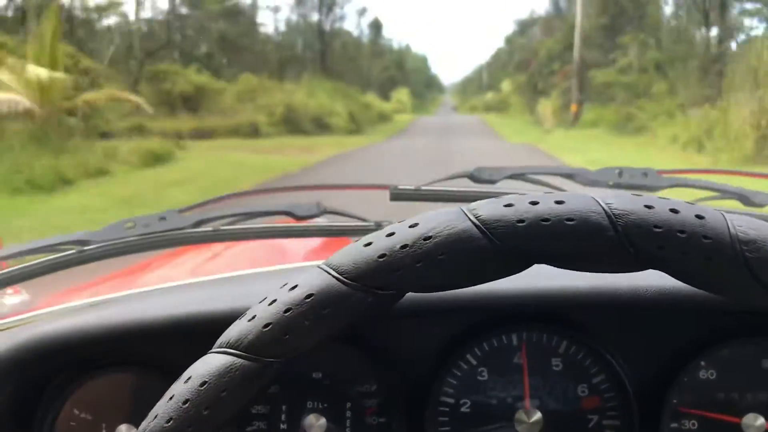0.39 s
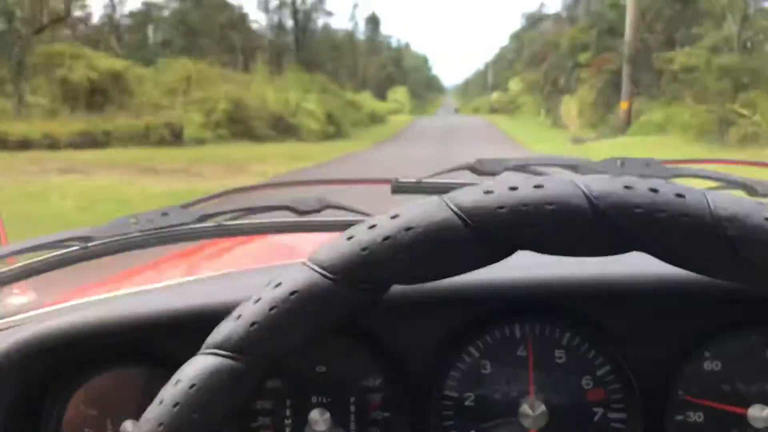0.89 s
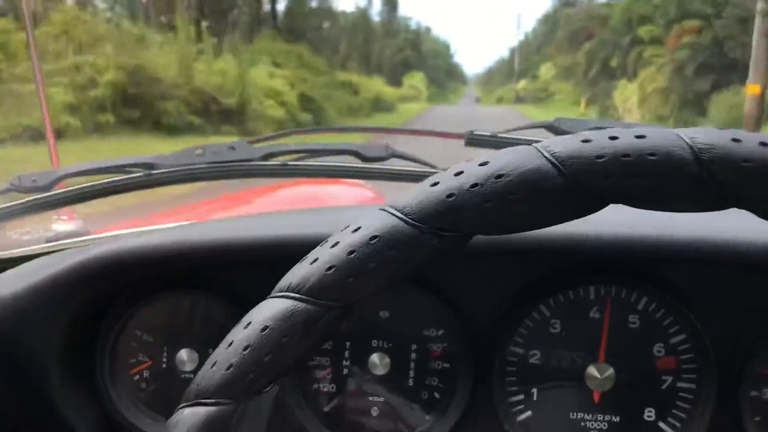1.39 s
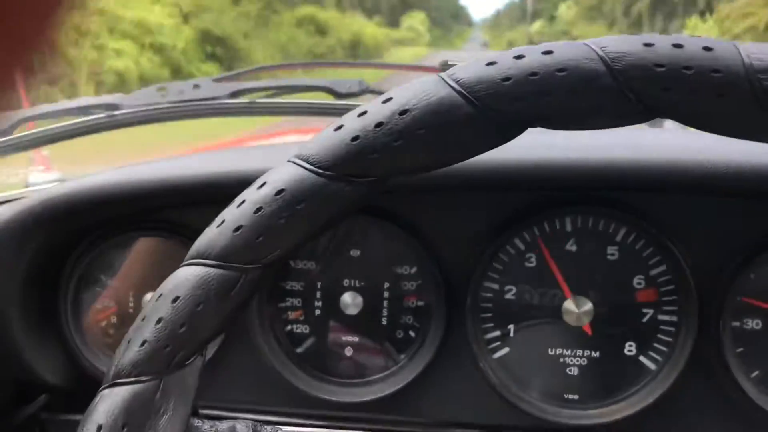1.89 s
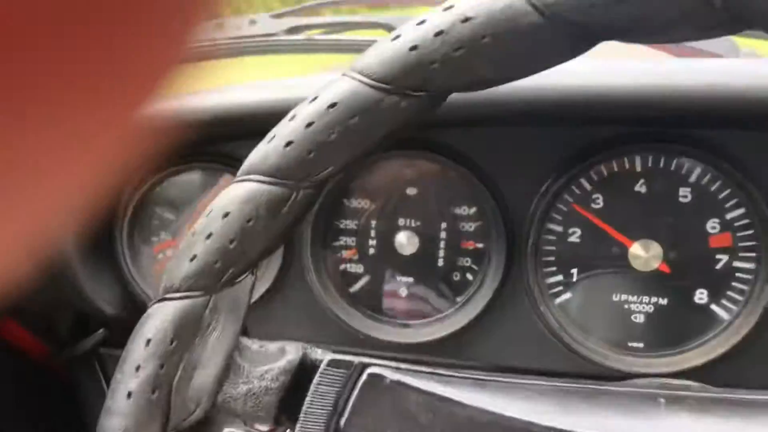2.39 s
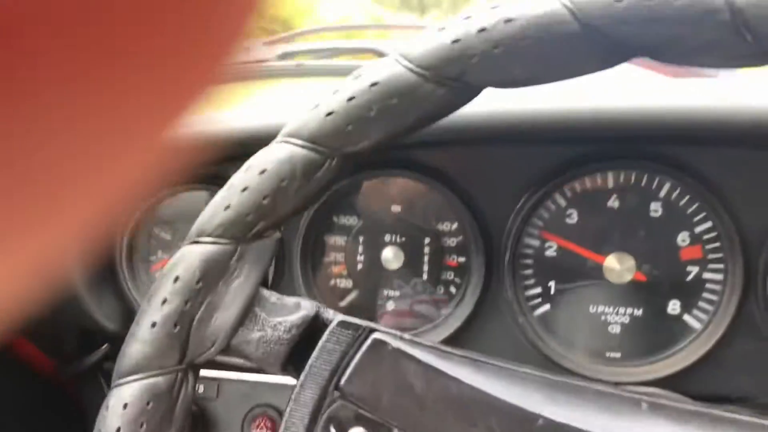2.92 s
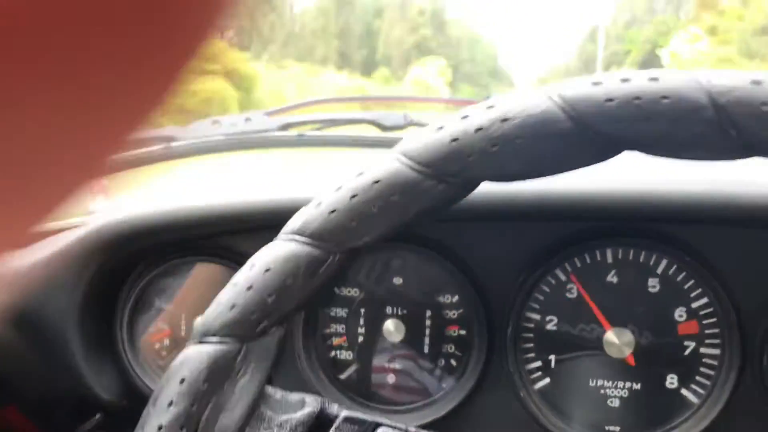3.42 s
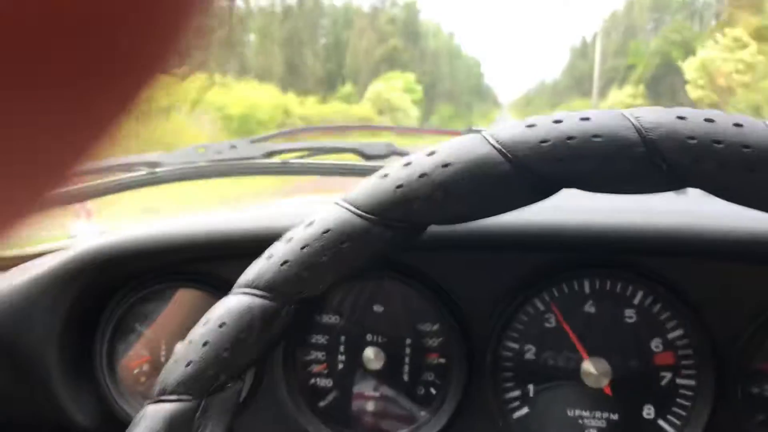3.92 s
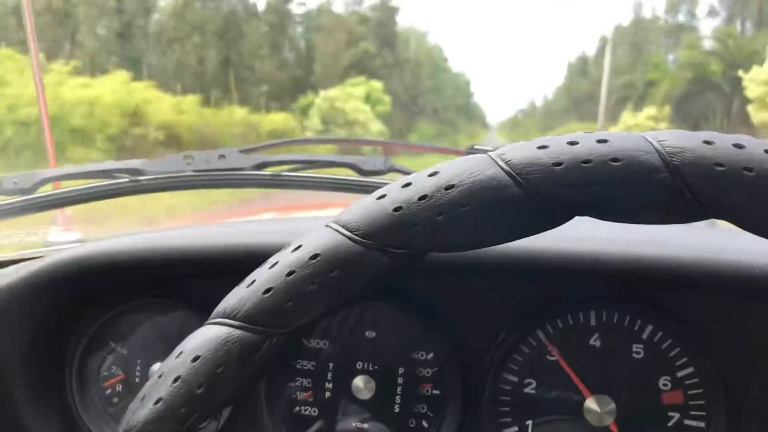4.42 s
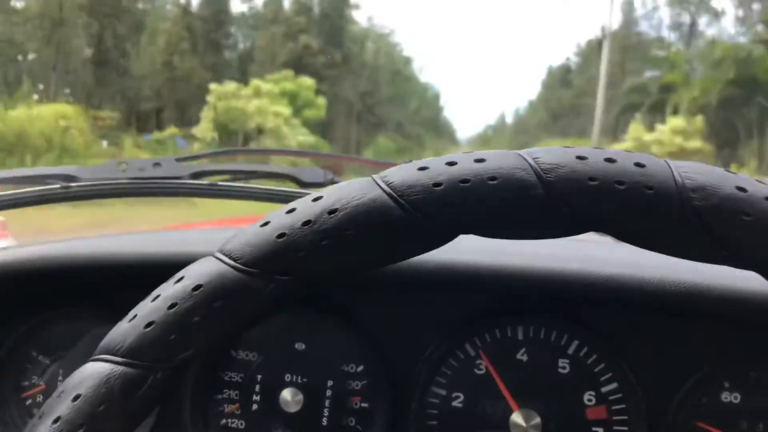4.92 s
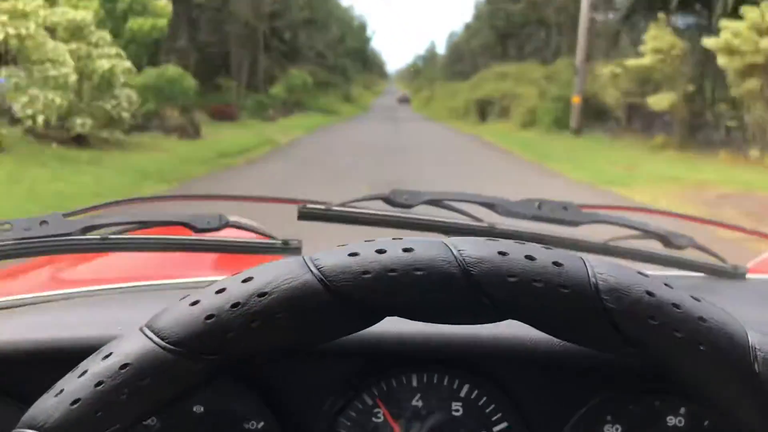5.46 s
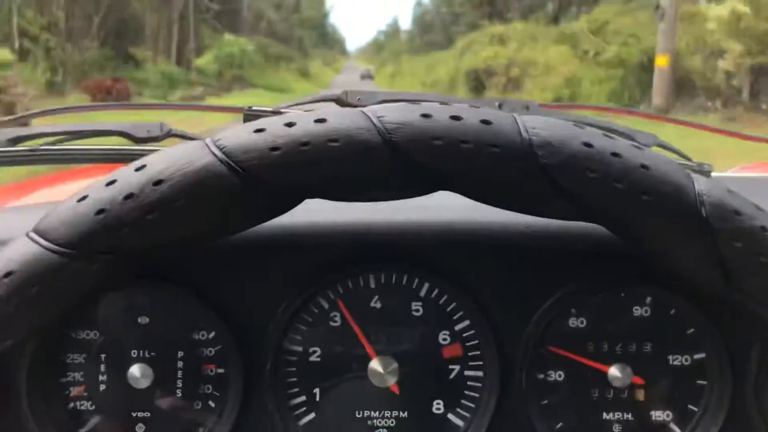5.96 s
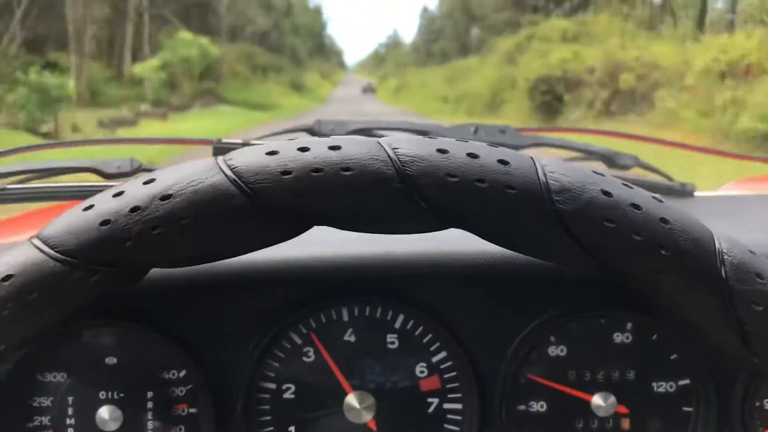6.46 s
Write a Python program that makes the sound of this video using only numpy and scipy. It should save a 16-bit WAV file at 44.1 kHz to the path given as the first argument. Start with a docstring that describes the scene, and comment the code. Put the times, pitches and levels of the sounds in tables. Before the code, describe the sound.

Close inside a small car on a country road, a raspy six-cylinder engine pulls hard and rises slightly. The throttle lifts, pitch slides down nearly an octave with bassy cabin buffeting, the gear lever clunks, and the engine climbs again to a steadier, lower drone. Keys tick brightly against the dash over tyre roar and airy hiss; plastic snaps once later.

```python
"""An air-cooled six-cylinder engine, heard from the driver's seat on a country road, pulls, falls away for a
gear change, is caught by the clutch and pulls again: a sum of half orders of the crank, weighted by load.
Noise drives cabin modes (boom, buffeting), the intake's song and the fan's whistle; shaped noise makes the
road's roar and the hiss of wind and cooling air. Keys tick against the dash, the gear lever knocks and
plastic snaps as struck, decaying modes; a rustle is a burst of filtered noise."""
import sys
import numpy as np
from scipy import signal
from scipy.io import wavfile
from scipy.ndimage import uniform_filter1d

SR = 44100
rng = np.random.default_rng(int(sys.argv[2]) if len(sys.argv) > 2 else 0)


def master(y):
    """Save y as 16-bit WAV."""
    cut = np.clip(np.atleast_2d(y).T, -1, 1)
    pcm = np.round(cut * 32767)  # scale
    wavfile.write(sys.argv[1], SR, pcm.astype(np.int16))


def field_ratio(decibels):
    """Amplitude ratio for a level in dB (20 dB per decade); scalars and array-likes work."""
    return 10 ** (np.asarray(decibels, dtype=float) / 20)


N = 290178

# Throttle: (t/s, share of full load)
LOAD = [(0, 1), (1.28, .9), (1.4, .3), (1.72, .16), (1.8, .03), (2.78, .03), (2.88, .5), (3.3, .6),
        (5.2, .75), (6.58, .65)]
# Cooling fan: (multiple of crank speed, whistle width/Hz, whistle level/dB before its growth with speed)
FAN = (12, 25, -12)


def evened(x):
    """Normalization: scales to rms 1."""
    return x / np.sqrt(np.mean(x ** 2) + 1e-20)


def columns(rows):
    """Linear interpolation: every column of a time table, at each sample."""
    s, *values = np.transpose(rows)
    return [np.interp(np.arange(N) / SR, s, v) for v in values]


def read(points, hz):
    """Spectral envelope: a table of (f/Hz, level/dB) joined by lines on a log-frequency axis."""
    f, db = np.transpose(points)
    return np.interp(np.log(hz + 1), np.log(f + 1), db)


def wander(hz):
    """Low-pass random process: slow chance of rms about 1 with its corner near hz."""
    rate = 400  # knots per second
    steps = rng.standard_normal(N * rate // SR + 2)
    knots = signal.lfilter([1], [1, -np.exp(-2 * np.pi * hz / rate)], steps)
    knots = evened(uniform_filter1d(knots, size=3))
    return np.interp(np.arange(N) * rate / SR, np.arange(len(knots)), knots)


def resonate(x, hz, width):
    """Heterodyne resonator: shifts hz down to zero, smooths with a double pole, shifts back; rms 1."""
    turn = np.exp(2j * np.pi * np.cumsum(hz * np.ones(len(x))) / SR)
    r = np.exp(-np.pi * width / SR)
    smooth = signal.lfilter([1], [1, -2 * r, r * r], x / turn)
    return evened((turn * smooth).real)


def noise(points, patchy_db, size):
    """Spectral synthesis: random short-time spectra under an envelope with drifting patches; rms 1."""
    hz = np.fft.rfftfreq(size, 1 / SR)
    a, b, patches = rng.standard_normal((4 * N // size + 5, len(hz), 3)).T
    patches = uniform_filter1d(patches, size=12, axis=0)  # across frequency
    patches = evened(uniform_filter1d(patches, size=10, axis=1))  # across time
    z = (a + 1j * b) * field_ratio(read(points, hz)[:, None] + patchy_db * patches)
    return evened(signal.istft(z, nperseg=size, noverlap=size - size // 4)[1][:N])


def ring(modes, spread, rise):
    """Modal impulse response: decaying sines, struck unevenly by spread/dB, that build up over rise/s."""
    t = np.arange(SR // 10) / SR
    total = 0
    for hz, db, t60 in modes:
        level_luck, pitch_luck, phase = rng.standard_normal(3)
        decay = field_ratio(db + spread * level_luck - 60 * t / t60)
        total += decay * np.sin(2 * np.pi * hz * (1 + .006 * pitch_luck) * t + phase)
    return (1 - np.exp(-t / rise)) * total


def add(mix, s, sound):
    """Superposition: lays a sound into the mix at time s."""
    part = mix[round(s * SR):][:len(sound)]
    part += sound[:len(part)]


def air_hiss():
    """Turbulence noise: wind and cooling air as broadband hiss whose level flickers slightly."""
    # Hiss spectrum: (f/Hz, relative level/dB)
    spectrum = [(1500, -2), (2500, -3.5), (3100, -4.5), (4260, -5.5), (5000, -12), (5500, -8.5),
                (7000, -11.5), (7700, -14), (8300, -11.5), (9800, -13.5), (10450, -18.5), (11100, -14),
                (14000, -14), (15700, -15.5), (15900, -54)]
    return noise(spectrum, patchy_db=1.08, size=256) * field_ratio(0.51 * wander(hz=21))


def buffeting():
    """Cavity resonance: noise excites the lowest cabin mode, its size partly evened from cycle to cycle."""
    # Level of the lowest cabin mode: (t/s, level/dB before slight wavering)
    level = [(0, -39), (1.7, -19), (2.25, -11.5), (2.35, -25.5), (6.58, -15)]
    surge = resonate(rng.standard_normal(N), hz=47.5, width=14.4)
    surge /= np.sqrt(uniform_filter1d(surge ** 2, size=3000) + 0.51)
    return field_ratio(columns(level)[0] + 0.83 * wander(hz=6.0)) * surge


def road_boom():
    """Room modes: the road's bumps, as one noise, drive all the cabin modes."""
    # Cabin modes: (f/Hz, width/Hz, level/dB over the roar's reference)
    modes = [(69.8, 41, 4), (149.4, 23.3, 2), (291.3, 44, -4), (409, 49, -9), (561.4, 59, -9.5),
             (1035, 110, -17.5)]
    bumps = rng.standard_normal(N)
    return sum(field_ratio(db) * resonate(bumps, hz, width) for hz, width, db in modes)


def roar():
    """Broadband noise under a falling spectral envelope: the engine and tyre roar."""
    # Roar spectrum: (f/Hz, relative level/dB)
    spectrum = [(15, -8), (25, 17.5), (54, 5.5), (151, -13), (201, 0), (286, -13.5), (510, -12), (569, -19),
                (636, -16.5), (1480, -21), (3750, -36.5), (5000, -47), (6500, -70), (11000, -120)]
    return field_ratio(9.5) * noise(spectrum, patchy_db=0.92, size=2048)


def intake_song():
    """Tract resonance: noise makes the intake sing under load."""
    # Resonance of the tract: (f/Hz, width/Hz, level/dB before the song's level)
    tract = [(1393.5, 45, -11)]
    # Course of the song: (t/s, level/dB)
    song = [(0, 0), (.8, 4.5), (1.1, -12), (3, -25), (3.4, -6), (4.2, -13), (5.2, -5), (5.5, -13),
            (6.58, -11)]
    air = rng.standard_normal(N)
    return field_ratio(columns(song)[0]) * sum(field_ratio(db) * resonate(air, hz, width) for hz, width, db in tract)


def fan_whistle(turns):
    """Blade-passing noise: a narrow band follows crank speed, its amplitude a power of that speed."""
    multiple, width, db = FAN
    crank_hz = np.gradient(turns) * SR
    growth = (crank_hz / 67.6) ** 5.4  # 1 at a crank speed of 67.6 Hz
    return growth * field_ratio(db) * resonate(rng.standard_normal(N), multiple * crank_hz, width)


def firing_throb(turns):
    """Amplitude modulation: a gain that pulses at crank orders 0.5, 1 and 1.5, deeper under load."""
    load, = columns(LOAD)
    pulses = .25 * np.cos(3 * np.pi * turns) + .2 * np.cos(np.pi * turns) + .15 * np.cos(2 * np.pi * turns)
    return 1 + load * pulses


def rustle():
    """Band-limited noise: a burst that decays without ringing and ends after 0.1 s."""
    # Rustles: (t/s, starting level/dB, low edge f/Hz, high edge f/Hz, t60/s)
    rustles = [(4.41, -44.5, 8850, 15700, 0.61)]
    out, t = np.zeros(N), np.arange(SR // 10) / SR
    for s, db, low_hz, high_hz, t60 in rustles:
        band = signal.butter(4, [low_hz, high_hz], "band", fs=SR, output="sos")
        settled = signal.sosfilt(band, rng.standard_normal(2 * len(t)))[len(t):]
        add(out, s, field_ratio(db - 60 * t / t60) * evened(settled))
    return out


def knocks():
    """Impact on damped bodies: the gear lever's clunks, plastic snaps and a dry tick excite short modes."""
    # The lever goes home in two steps, plastic snaps twice, one sharp tick: (t/s, blow level/dB)
    clunks, snaps, tick = [(2.664, -7.5), (2.677, -6.5)], [(4.0028, -15), (4.008, -23)], [(4.0316, -14.5)]
    # Modes of the linkage, the plastic part and the buckle: (f/Hz, relative level/dB, t60/s)
    linkage, plastic, buckle = [(112, 6, 0.06), (247, -2, 0.05), (376, -4, 0.045), (450, -4.5, 0.045),
                                (600, -8, 0.045), (745, -10, 0.05), (1165, -19, 0.04), (3300, -27, .01),
                                (4300, -27, .01)], [(1150, 2.5, .017), (1700, -2, .01), (2350, -2, .01),
                                                 (3500, -2, .008), (4400, -4, .008), (5900, -4, .007),
                                                 (7500, -10, .006)], [(4200, -3, .003), (6500, -6, .003),
                                                                  (8700, 0, .003), (12000, -6, .003),
                                                                  (15300, -2, .003)]
    out = np.zeros(N)
    for blows, modes, rise in ((clunks, linkage, .003), (snaps, plastic, .0006), (tick, buckle, .0001)):
        for s, db in blows:
            add(out, s, field_ratio(db) * ring(modes, spread=1.0, rise=rise))
    return out


def keys():
    """Impact and free vibration: each tick is a noise crack, then the keys ring briefly."""
    # Ticks of the keys together, and chinks of the smallest key: (t/s, blow level/dB)
    ticks, chinks = [(0.1032, -29), (1.0437, -27), (1.227, -26.5), (1.476, -28), (1.519, -25),
                     (1.6012, -26), (1.6685, -30), (1.7249, -27), (1.8774, -31), (1.936, -22),
                     (2.1021, -25.5), (2.198, -26), (2.259, -24.5), (2.356, -28), (2.4689, -29),
                     (2.659, -26), (2.7009, -22), (2.8048, -32), (3.8396, -29), (4.109, -26), (5.9183, -30),
                     (5.9677, -23), (6.5236, -27)], [(1.046, -23), (1.24, -22), (1.6132, -33), (3.6022, -26), (3.8048, -33),
                                    (3.9723, -25), (4.6213, -35)]
    # Modes of the keys together and of the smallest key: (f/Hz, relative level/dB, t60/s)
    key_modes, small_key = [(6430, -6.5, 0.033), (8240, -4, 0.028), (9620, -11, 0.03), (12300, -9, 0.059),
                            (13400, -36, .04)], [(8850, -17.5, 0.029), (12300, -19, 0.057), (14700, -6, 0.043),
                                          (15050, -10, 0.054)]
    out, t = np.zeros(N), np.arange(SR // 10) / SR
    # 70 faint ticks at random times
    faint = [(s * N / SR, -42 + 0.94 * np.log(1 / u)) for s, u in rng.random((70, 2))]
    for s, db in ticks + faint:
        crack = signal.lfilter([1, -.8], [1], rng.standard_normal(len(t))) * field_ratio(-9 - 60 * t / 0.01)
        add(out, s, field_ratio(db) * (crack + field_ratio(-9.5) * ring(key_modes, spread=4, rise=.0003)))
    for s, db in chinks:
        jingle = np.diff(rng.standard_normal(len(t) + 2), 2) * field_ratio(-15 - 60 * t / .05)
        add(out, s, field_ratio(db) * (jingle + ring(small_key, spread=2.5, rise=.0008)))
    return out


def engine():
    """Order synthesis: each half order of the crank is an unsteady tone; also returns the angle in turns."""
    # Speed: (t/s, firings of one bank of three cylinders per s)
    speed = [(0, 101.9), (.75, 106.2), (1.25, 108.8), (1.36, 105.5), (1.6, 94), (1.72, 90), (2.3, 63),
             (2.75, 48), (2.86, 47.8), (3.17, 62.5), (3.36, 76), (3.48, 73.8), (4.05, 74.3), (5.28, 76.1),
             (5.77, 79.1), (6.58, 80.8)]
    # Crank orders 1, 1.5, 3, 4.5 and 6: (level/dB at full load before the cabin, wavering/dB)
    strong_levels = [(-20, 2.5), (-16.5, 1), (-20, 1), (-22.5, 1), (-26.5, 0.6)]
    # Share of the load's dB that each of them follows
    follow = (.35, 1., .45, 1.1, .75)
    # How the cabin passes them: (f/Hz, gain/dB)
    cabin = [(45, -2), (60, 0), (69, 2.5), (80, 0.7), (105, -2), (150, -0.5), (182, 3), (222, -4), (250, 0),
             (300, 1), (325, -3), (420, -6.5)]
    # How pipes and body pass the other half orders: (f/Hz, level/dB at full load before the additions below)
    pipes = [(20, -50), (35, -34), (140, -35.5), (200, -32), (290, -36), (350, -46), (420, -36.5),
             (560, -45), (650, -47), (830, -47.5), (1000, -57.5), (1330, -64.5), (1410, -47), (1490, -60),
             (1600, -56.5)]
    crank_hz = columns(speed)[0] / 1.5  # three firings a bank in two turns
    turns = np.cumsum(crank_hz * (1 + 0.0016 * wander(hz=4.76))) / SR
    strong = dict(zip((1, 1.5, 3, 4.5, 6), zip(strong_levels, follow)))
    load_db = 20 * np.log10(np.clip(columns(LOAD)[0], .01, 1))
    bank_db, whole_db, fan_db = 4.5, -1, 4  # additions: bank-rate harmonics, whole orders, the fan's order
    tones = 0
    for k in np.arange(.5, 30, .5):
        if k in strong:
            (full_db, waver_db), share = strong[k]
            db = full_db + read(cabin, k * crank_hz) + share * load_db
            db += waver_db * wander(hz=1.7)  # uneven combustion
        else:
            db = read(pipes, k * crank_hz) + load_db + 2.95 * wander(hz=4.3)
            db += bank_db * (k % 1.5 == 0) + whole_db * (k % 1 == 0) + fan_db * (k == FAN[0])
        tones += np.sqrt(2) * field_ratio(db) * np.cos(2 * np.pi * (k * turns + rng.random()))
    return tones, turns


def scene():
    """Superposition of everything heard at the driver's seat."""
    # Road: (t/s, reference level/dB of the engine and tyre roar, hiss level/dB)
    road = [(0.0, -27, -39), (0.48, -26.5, -38.5), (0.9, -27, -35.5), (1.57, -25, -40.5),
            (2.77, -28.5, -44), (3.98, -29, -41), (4.87, -30, -44.5), (5.52, -28.5, -40),
            (6.07, -28.5, -42), (6.58, -28.5, -38)]
    roar_db, hiss_db = columns(road)
    tones, turns = engine()
    throbbing = firing_throb(turns) * (roar() + intake_song() + fan_whistle(turns))
    background = field_ratio(hiss_db) * air_hiss() + buffeting() + field_ratio(roar_db) * (road_boom() + throbbing)
    return (background + rustle() + knocks() + keys() + tones)[None]


def band_limit(x):
    """A steep low-pass at the top of the band."""
    return signal.sosfilt(signal.butter(12, 16530, fs=SR, output="sos"), x)


def record(dry):
    """Band limiting and saturation: the microphone cuts deep bass and top, and softly squeezes peaks."""
    cut = signal.oaconvolve(dry, signal.firwin(255, 15900, fs=SR)[None], "same")
    cut = signal.sosfilt(signal.butter(7, 33, "high", fs=SR, output="sos"), cut)
    ceiling = 1.6
    return band_limit(ceiling * np.tanh(cut / ceiling))


dry = scene()
out = record(dry)
master(out)
```